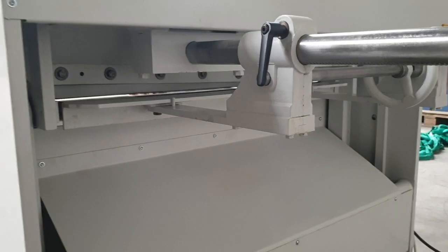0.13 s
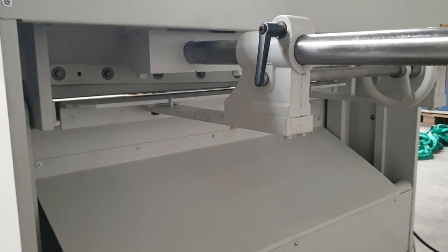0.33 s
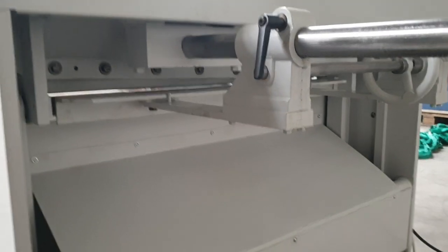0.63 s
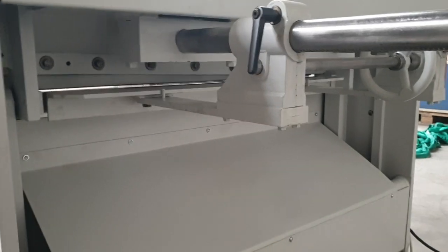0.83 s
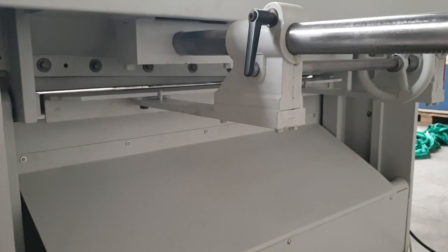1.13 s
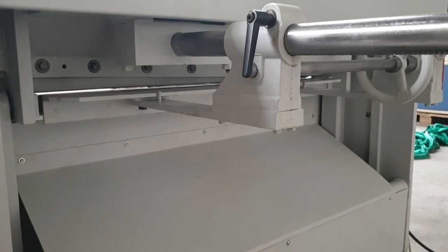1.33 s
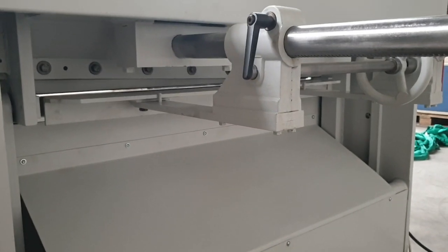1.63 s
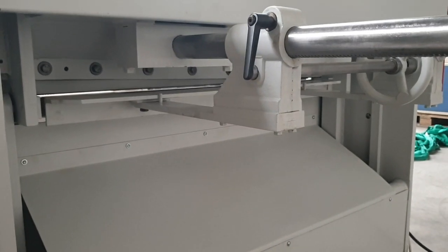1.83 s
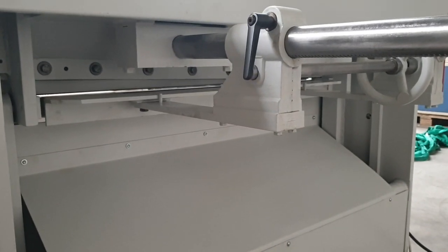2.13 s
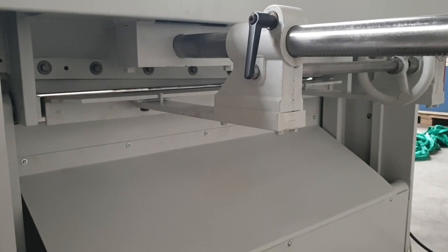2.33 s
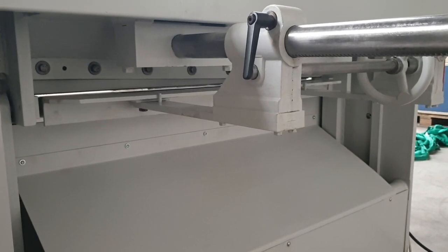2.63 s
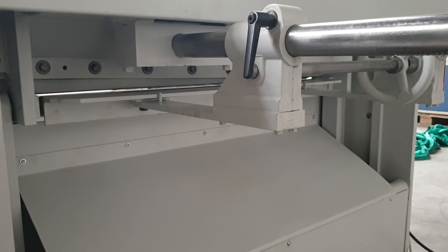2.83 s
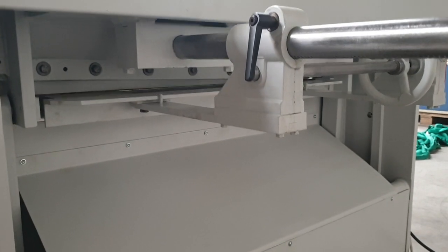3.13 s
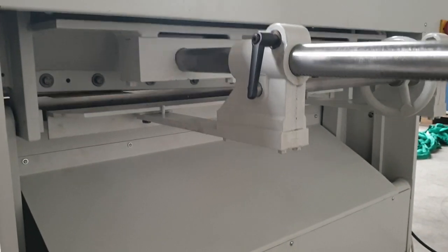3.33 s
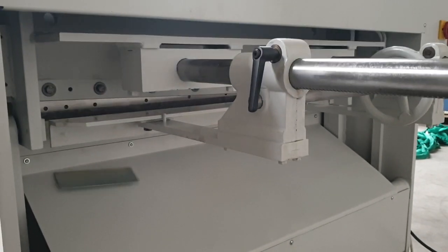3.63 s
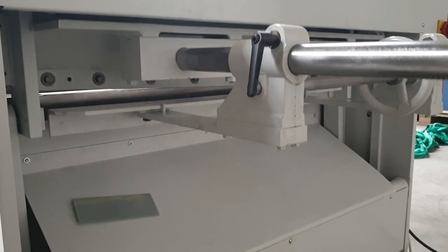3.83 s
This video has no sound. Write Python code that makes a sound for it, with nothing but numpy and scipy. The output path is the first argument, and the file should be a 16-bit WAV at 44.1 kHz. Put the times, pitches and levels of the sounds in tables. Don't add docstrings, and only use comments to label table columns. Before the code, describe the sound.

A metal shear stands in a quietly humming, echoing workshop, then bangs through a steel strip; the frame thuds and the offcut clatters, ringing, onto a sheet-metal chute, heard from a handheld stereo recorder behind the machine.

```python
import sys
import numpy as np
from scipy import signal
from scipy.io import wavfile
from scipy.ndimage import uniform_filter1d

SR = 44100
rng = np.random.default_rng(int(sys.argv[2]) if len(sys.argv) > 2 else 0)


def unload_audio(sound):
    columns = np.transpose(np.atleast_2d(sound))
    steps = np.round(np.clip(columns, -1, 1) * 32767)
    wavfile.write(sys.argv[1], SR, steps.astype(np.int16))


def attenuation_scalar(level_db):
    decades = np.asarray(level_db, float) / 20
    return 10 ** decades


N = 176400

# frequency in Hz, level in dB per Hz.
METAL_HASH = [(290, -38), (500, -12.5), (4800, -11), (5310, -10.5), (7420, -17.5), (10100, -4.5),
              (12500, -10.5), (16000, -17.5)]


def evened(x):
    return x / np.sqrt(np.mean(x ** 2) + 1e-20)


def read(points, hz):
    f, value = np.transpose(points)
    return np.interp(np.log(hz + 1), np.log(f + 1), value)


def closed(points, hz):
    outside = (hz < points[0][0]) | (hz > points[-1][0])
    return np.where(outside, -120, read(points, hz))


def curve(rows, column):
    rows = np.array(rows)
    return np.interp(np.arange(N) / SR, rows[:, 0], rows[:, column])


def add(mix, s, sound):
    part = mix[:, int(round(s * SR)):][:, :sound.shape[1]]
    part += sound[:, :part.shape[1]]


def port_gain(hz):
    # frequency in Hz, left minus right in dB.
    port_difference = [(100, -.5), (700, -3.5), (2400, -7), (5000, -4.5), (7000, 15.5), (9000, 41),
                       (12000, 10.5), (15000, 2.5)]
    ratio = attenuation_scalar(2 * read(port_difference, hz))
    power = 2 * np.array([ratio, np.ones_like(ratio)]) / (1 + ratio)
    return np.sqrt(power)


def noise(shape, count, size, patchy_db=0.):
    # frequency in Hz, likeness from 0 to 1.
    likeness = [(60, 0.85), (290, 0.88), (700, 0.6), (1400, 0.054), (15000, 0.012)]
    frames = 4 * count // size + 5
    hz = np.fft.rfftfreq(size, 1 / SR)[:, None]
    a, b, c, d, patch = rng.standard_normal((frames, len(hz), 5)).T
    patch = uniform_filter1d(patch, size=4, axis=0)
    patch = evened(uniform_filter1d(patch, size=5, axis=1))
    alike = np.clip(read(likeness, hz), -1, 1)
    left = a + 1j * b
    right = alike * left + np.sqrt(1 - alike ** 2) * (c + 1j * d)
    z = np.array([left, right]) * port_gain(hz)
    t = np.arange(frames)[None] * size / 4 / SR
    gain = attenuation_scalar(shape(hz, t) + patchy_db * patch)
    at_start = attenuation_scalar(shape(hz, np.zeros((1, 1))))
    norm = np.sqrt(np.sum(at_start ** 2) / 1.5)
    return signal.istft(z * gain, nperseg=size, noverlap=3 * size // 4)[1][:, :count] / norm


def resonate(x, hz, width):
    turn = np.exp(2j * np.pi * np.cumsum(hz * np.ones(N)) / SR)
    r = np.exp(-np.pi * width / SR)
    return 2 * (turn * signal.lfilter([1 - r], [1, -r], x / turn)).real


def workshop():
    # time in seconds, hum pitch in Hz, hum level in dB.
    hum_path = [(.28, 71.9, -58), (.4, 72.1, -51.5), (.69, 73.9, -56), (.85, 74.35, -49.5),
                (1.1, 77.6, -52), (1.26, 76.8, -58.5), (1.37, 73.44, -50), (1.5, 70.2, -58.5),
                (2.5, 51.8, -57.5), (2.72, 52.2, -49), (2.82, 53, -62)]
    # frequency in Hz, level in dB per Hz.
    drone_spectrum = [(25, -18), (60, 6), (135, -6), (211, -13), (919, -35.5), (1700, -46.5)]
    # frequency in Hz, level in dB per Hz.
    hiss_spectrum = [(710, -27), (1200, -14), (1680, 0), (7800, -28.5), (11800, -11), (15100, -16),
                     (16200, -27)]
    fan_hz, fan_width_hz, fan_db = 203.6, 50.7, -58.5
    duct_hz, duct_width_hz, duct_db = 885, 178, -25.5
    whine_hz, whine_db, whine_s = 1855, -80.5, 0.62
    drone_db, rise_db_per_s = -58, 3
    hiss_db, early_hiss_db, early_hiss_fade_s = -78, -69.5, 0.22

    t = np.arange(N) / SR
    white = noise(lambda hz, u: 0 * hz + 0 * u, N, size=2048)

    pitch = curve(hum_path, 1)
    tone = np.sin(2 * np.pi * np.cumsum(pitch) / SR)
    tone = tone + .3 * evened(resonate(white, pitch, 20))
    hum = tone * attenuation_scalar(curve(hum_path, 2))

    fan = resonate(resonate(white, fan_hz, fan_width_hz), fan_hz, fan_width_hz)
    fan = evened(fan) * attenuation_scalar(fan_db)
    duct = resonate(resonate(white, duct_hz, duct_width_hz), duct_hz, duct_width_hz)
    duct = evened(duct) * attenuation_scalar(duct_db)
    duct = duct * attenuation_scalar(2 * rise_db_per_s * (np.minimum(t, 2) - 0.22))
    whine = evened(resonate(white, whine_hz, 25))
    whine = whine * attenuation_scalar(whine_db - 11 * ((t - whine_s) / 0.19) ** 2)

    drone_shape = lambda hz, u: closed(drone_spectrum, hz) + rise_db_per_s * u * (hz > 260)
    drone = noise(drone_shape, N, size=2048, patchy_db=3.5)
    hiss = noise(lambda hz, u: closed(hiss_spectrum, hz) + 0 * u, N, size=512, patchy_db=1.6)
    hiss = hiss * attenuation_scalar(hiss_db)

    early_hiss_shape = lambda hz, u: closed(METAL_HASH, hz) - 9 * (u / early_hiss_fade_s) ** 2 * (hz > 6000)
    early_hiss = noise(early_hiss_shape, N, size=512)
    early_hiss *= attenuation_scalar(early_hiss_db - 60 * np.maximum(t - .3, 0) / 0.21)
    return hum + fan + (drone + duct) * attenuation_scalar(drone_db) + hiss + early_hiss + whine


def ring(db, hz, held_s, t60):
    rise_cycles, flutter_db, flutter_hz = 2.5, 2.5, 46.3
    ports_part_hz = 1500
    t = np.arange(12000) / SR
    flutter = flutter_db * np.sin(2 * np.pi * flutter_hz * t + hz)
    level_db = db + flutter - 60 * np.maximum(t - held_s, 0) / t60
    apart = np.array([[0], [np.pi / 2 * min(hz / ports_part_hz, 1)]])
    swing = np.sin(2 * np.pi * hz * t + apart) * np.minimum(t * hz / rise_cycles, 1)
    return port_gain(np.array([hz])) * attenuation_scalar(level_db) * swing


def frame():
    # time in seconds, level in dB.
    ram_travel = [(3.07, -63.5), (3.1, -33.5), (3.15, -31), (3.24, -28), (3.3, -33.5), (3.42, -34.5),
                  (3.5, -29.5), (4, -38)]
    # frequency in Hz, level in dB per Hz.
    shudder_spectrum = [(48, -0.5), (220, -6), (450, -11.5), (900, -10), (1500, -19), (4000, -34.5)]
    # start in seconds, level in dB, pitch in Hz, time to fall 60 dB in seconds.
    thuds = [(3.11, -33.5, 294, 0.17), (3.09, -34.5, 84, 0.18), (3.221, -23, 118, 0.13),
             (3.291, -28.5, 225, 0.26), (3.301, -28, 116, 0.17), (3.349, -27.5, 103, 0.13),
             (3.385, -33.5, 110, 0.16), (3.203, -30, 160, 0.1), (3.442, -16, 79, 0.093),
             (3.496, -26, 71, 0.17), (3.495, -20, 197, 0.084), (3.49, -33, 295, 0.18),
             (3.544, -22, 114, 0.085), (3.441, -21.5, 191, 0.098), (3.484, -21, 143, 0.11),
             (3.538, -30.5, 200, 0.12), (3.63, -30.5, 97.2, 0.33), (3.505, -21.5, 976, 0.23),
             (3.625, -25, 950, 0.17), (3.617, -21, 1326, 0.16), (3.695, -13, 1335, 0.06),
             (3.7, -34.5, 590, 0.17)]
    thud_rise_s = .012
    shudder_shape = lambda hz, t: closed(shudder_spectrum, hz) + 0 * t
    out = noise(shudder_shape, N, size=1024, patchy_db=1) * attenuation_scalar(curve(ram_travel, 1))
    out *= np.arange(N) / SR > ram_travel[0][0]
    t = np.arange(SR // 2) / SR
    for s, db, hz, t60 in thuds:
        level = (1 - np.exp(-t / thud_rise_s)) * attenuation_scalar(db + 8.0 - 60 * t / t60)
        swing = level * np.sin(2 * np.pi * hz * t)
        add(out, s, port_gain(np.array([hz])) * swing)
    return out


def crack(db, tilt_db, scale):
    # frequency in Hz, level in dB per Hz.
    crack_spectrum = [(300, -26), (494, -23), (1900, -6.5), (2900, -1.5), (4370, 1), (5600, -5),
                      (6600, -11.5), (10700, -5.5), (12500, -13), (16000, -27)]
    # frequency in Hz, time to fall 60 dB in seconds.
    crack_decay = [(300, 0.6), (2000, 0.094), (7000, 0.076), (11000, 0.088), (16000, 0.073)]

    def shape(hz, t):
        tilt = tilt_db * np.log2(hz / 3000 + 0.027)
        return closed(crack_spectrum, hz) + tilt - 60 * t / (scale * read(crack_decay, hz))

    rise = np.minimum(np.arange(16000) / (0.00021 * SR), 1)
    return attenuation_scalar(db) * noise(shape, count=16000, size=128, patchy_db=2.5) * rise


def bounce(db, tilt_db, lead_hz, free_s):
    # pitch in Hz, level in dB.
    bending = [(1723, -43), (1976, -43.5), (2455, -48), (2632, -38), (2972, -41), (3370, -38),
               (3768, -39.5)]
    # pitch in Hz, level in dB.
    twisting = [(4183, -36), (4506, -37.5), (5157, -30), (5243, -38.5), (5523, -38), (5835, -37),
                (6385, -33), (7014, -37), (7784, -43), (8021, -41), (8328, -35.5)]
    # pitch in Hz, level in dB.
    edge_modes = [(8823, -34), (9162, -36), (9695, -26.5), (10298, -30), (10444, -24.5), (10627, -88),
                  (11057, -25.5), (11962, -33), (12688, -49), (13835, -42), (15213, -61)]
    # frequency in Hz, time to fall 60 dB in seconds.
    ring_decay = [(600, 1), (3000, 1), (5300, 0.62), (10500, 0.3), (15000, 0.34)]
    choke_t60, scatter_t60 = 0.097, .11
    lead_boost_db, lead_octaves, chance_db = 9.5, 0.076, 4
    tumble_swing_db, tumbles_per_s = 6, 110
    strip_db, scatter_level_db = -3.5, -2

    hz, level_db = np.transpose(bending + twisting + edge_modes)[:, :, None]
    t = np.arange(8000) / SR
    choke_db = -60 * np.maximum(t - free_s, 0) / choke_t60
    lead_db = lead_boost_db * np.exp(-(np.log2(hz / lead_hz) / lead_octaves) ** 2)
    chance = chance_db * rng.standard_normal(hz.shape)
    size = attenuation_scalar(level_db + tilt_db * np.log2(hz / 5000) + lead_db + chance)
    phase = rng.random((2, len(hz), 1)) * 2 * np.pi
    detune = 1 + .002 * rng.standard_normal(hz.shape)

    turns = rng.standard_normal((len(hz), 8000 * tumbles_per_s // SR + 2))
    paths = [np.interp(t * tumbles_per_s, np.arange(len(row)), row) for row in turns]
    tumble_db = tumble_swing_db * np.array(paths)
    wander = .16 * tumble_db[::-1]
    swing = np.sin(2 * np.pi * hz * detune * t + phase + wander)
    rings = port_gain(hz) * size * attenuation_scalar(tumble_db - 60 * t / read(ring_decay, hz)) * swing
    strip = attenuation_scalar(strip_db) * rings.sum(axis=1) * np.sqrt(2 / np.sum(size ** 2))

    def shape(f, u):
        fall_db = 60 * u / scatter_t60 * (1 + (f / 14000) ** 2)
        return closed(METAL_HASH, f) + tilt_db * np.log2(f / 5000 + 0.01) - fall_db

    scatter = noise(shape, count=8000, size=128, patchy_db=4.5) * attenuation_scalar(scatter_level_db)
    return attenuation_scalar(db + 5.0 + choke_db) * (strip + scatter) * np.minimum(t / 0.00053, 1)


def boom(db, centre_hz, t60):
    width_octaves, knocks_per_s, knock_db = 0.62, 600, 2

    def shape(hz, t):
        return -6 * (np.log2(hz / centre_hz + 0.0006) / width_octaves) ** 2 - 60 * t / t60

    knocks = rng.standard_normal(9000 * knocks_per_s // SR + 2)
    place = np.arange(9000) * knocks_per_s / SR
    grain = attenuation_scalar(knock_db * np.interp(place, np.arange(len(knocks)), knocks))
    rise = np.minimum(np.arange(9000) / (0.00018 * SR), 1)
    return attenuation_scalar(db) * noise(shape, count=9000, size=128, patchy_db=2.0) * grain * rise


def hall(x):
    # frequency in Hz, time to fall 60 dB in seconds.
    hall_decay = [(100, 1.2), (2000, 1.77), (10000, 0.8), (16000, 0.48)]
    taps = rng.standard_normal((2, SR)) * np.minimum(np.arange(SR) / (0.0061 * SR), 1)
    hz, t, z = signal.stft(taps, SR, nperseg=256)
    fading = z * attenuation_scalar(-60 * t / read(hall_decay, hz)[:, None])
    tail = signal.istft(fading, SR, nperseg=256)[1]
    return signal.fftconvolve(x, tail / np.linalg.norm(tail[0]), axes=1)[:, :N]


def scene():
    # start in seconds, level in dB, pitch in Hz, held seconds, then time to fall 60 dB in seconds.
    clear_rings = [(2.998, -61, 2593, .001, .02), (3.018, -52, 820, 0.0034, .025),
                   (3.018, -56, 1796, 0.0018, .02), (3.105, -13.5, 3150, .003, 0.036),
                   (3.222, -20.5, 224.8, 0.046, .1), (3.215, -30.5, 616, 0.013, 0.093),
                   (3.22, -29.5, 331, 0.017, 0.14), (3.51, -29.5, 540, 0.022, 0.076),
                   (3.492, -22, 11962, 0.052, 0.22), (3.5, -37, 6340, 0.027, .1),
                   (3.51, -27.5, 5243, 0.12, 0.071), (3.525, -24.5, 2643, 0.1, .1),
                   (3.535, -29.5, 3384, 0.067, 0.092), (3.54, -30, 1325, 0.078, 0.081),
                   (3.6215, -18, 1888, 0.004, 0.047), (3.625, -28, 2640, 0.074, 0.069),
                   (3.64, -21, 1330, .012, .1), (3.651, -28, 11050, 0.014, 0.073),
                   (3.674, -20, 1720, 0.0076, 0.033), (3.678, -30, 5560, .015, .04),
                   (3.717, -23, 9600, 0.015, .08), (3.73, -32.5, 2972, 0.096, 0.26),
                   (3.74, -27.5, 643, 0.034, .1), (3.76, -33, 2660, 0.036, .06),
                   (3.815, -34.5, 956, 0.039, 0.1), (3.8535, -14, 1738, .002, .025),
                   (3.855, -19.5, 6385, 0.027, 0.044), (3.858, -21, 9700, 0.03, 0.12),
                   (3.886, -12.5, 1753, 0.0015, 0.019), (3.8905, -11.5, 2000, 0.0016, 0.018),
                   (3.89, -33.5, 633, 0.029, .06), (3.893, -27, 5190, 0.041, 0.12),
                   (3.9, -29, 4508, .1, 0.16), (3.935, -31, 2690, 0.035, 0.039),
                   (3.972, -24.5, 5200, 0.02, 0.14), (3.98, -26, 9100, .012, 0.068)]
    # start in seconds, level in dB, tilt in dB per octave, stretch of the decay (no unit).
    cracks = [
        (3.088, -42, -11, 2.1),
        (3.1045, -10, 1.5, 1.25),
        (3.111, -21.5, -1, 2.35),
        (3.437, -34.5, 2, 4),
    ]
    # start in seconds, level in dB, tilt in dB per octave, leading mode in Hz, free ring in seconds.
    bounces = [(3.4885, -18.5, 0.5, 2610, 0.22), (3.508, -18, -1.5, 11000, 0.073),
               (3.533, -21, 4, 5100, 0.16), (3.621, -24, -3, 3370, 0.065),
               (3.652, -27.5, -7.5, 5700, 0.041), (3.693, -16, 0.5, 9970, 0.044),
               (3.714, -15, 0.5, 9740, 0.022), (3.724, -23.5, -2, 5360, 0.38),
               (3.80, -36.5, -0.5, 8860, 0.093), (3.854, -19.5, -0.5, 9600, 0.079),
               (3.8545, -22.5, 1.5, 6550, 0.09), (3.887, -20.5, -1, 5360, 0.029),
               (3.911, -26, 0.5, 10000, 0.027), (3.925, -33.5, -9, 4460, 0.09),
               (3.958, -31.5, -2, 9200, 0.025), (3.973, -23, -1, 5200, 0.036),
               (3.98, -20.5, 1, 9850, 0.006)]
    # start in seconds, level in dB, centre in Hz, time to fall 60 dB in seconds.
    booms = [(3.4885, -17.5, 5950, 0.029), (3.508, -17, 1190, 0.089), (3.621, -14, 1600, 0.2),
             (3.645, -19.5, 1750, 0.26), (3.70, -22.5, 1900, 0.24), (3.714, -20.5, 2500, 0.096),
             (3.724, -28.5, 2230, 0.39), (3.854, -33, 1574, 0.18), (3.886, -16, 2020, 0.035),
             (3.891, -26, 2400, .15)]
    near = np.zeros((2, N))
    for rows, source in ((clear_rings, ring), (cracks, crack), (bounces, bounce), (booms, boom)):
        for s, *rest in rows:
            add(near, s, source(*rest))
    hall_db = -14.5
    return workshop() + frame() + near + attenuation_scalar(hall_db) * hall(near)


def low_pass(x):
    return signal.sosfilt(signal.butter(12, 16310, fs=SR, output="sos"), x)


def record(dry):
    start_s, bass_cut_hz, treble_edge_hz = .067, 32., 15900
    opened = dry * np.clip((np.arange(N) / SR - start_s) / 0.00068, 0, 1)
    without_bass = signal.lfilter(*signal.butter(2, bass_cut_hz, "high", fs=SR), opened)
    clipped = np.tanh(without_bass)
    edge = signal.firwin(255, treble_edge_hz, window=("kaiser", 9), fs=SR)
    limited = signal.oaconvolve(clipped, edge[None], "same", axes=1)
    return low_pass(limited)


dry = scene()
out = record(dry)
unload_audio(out)
```